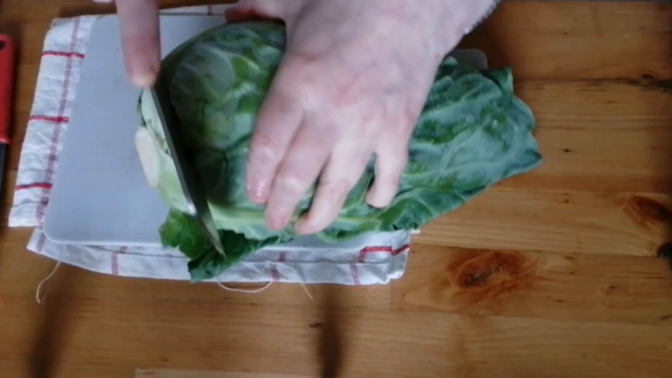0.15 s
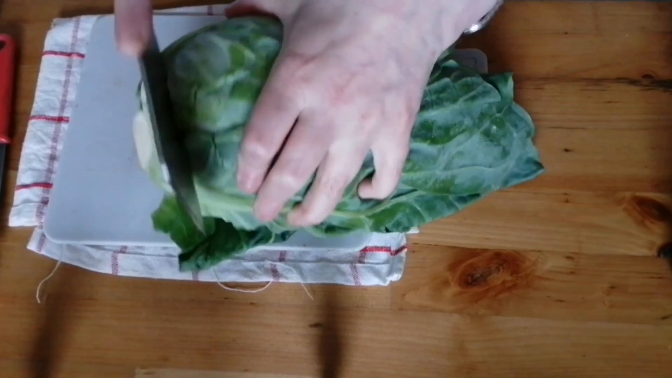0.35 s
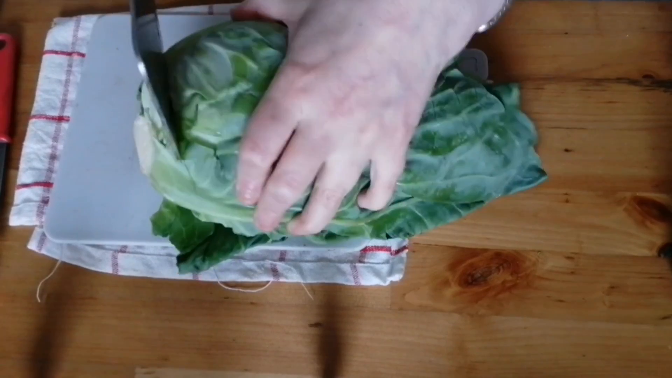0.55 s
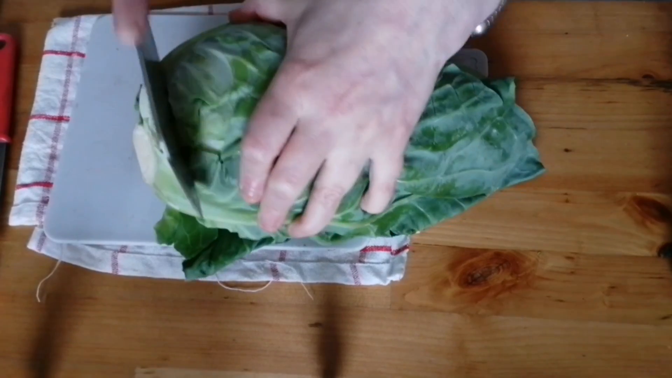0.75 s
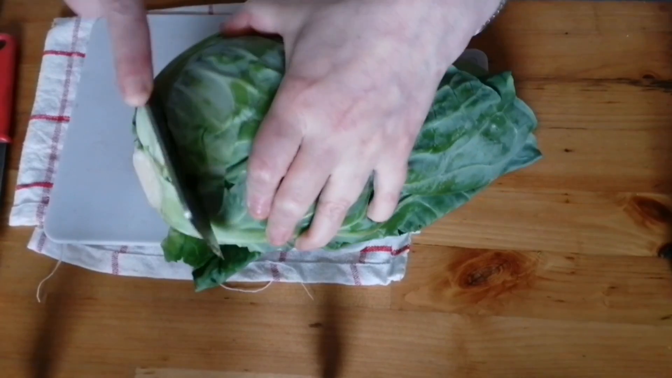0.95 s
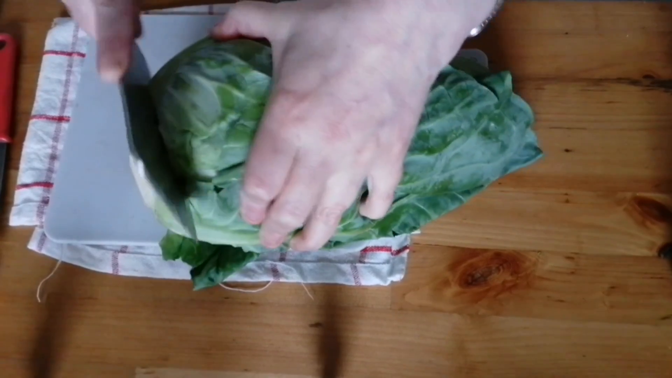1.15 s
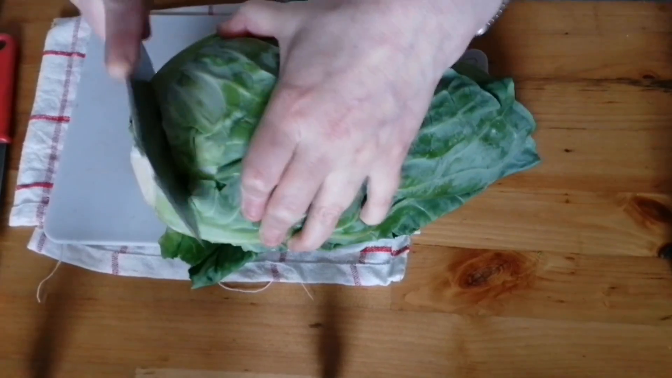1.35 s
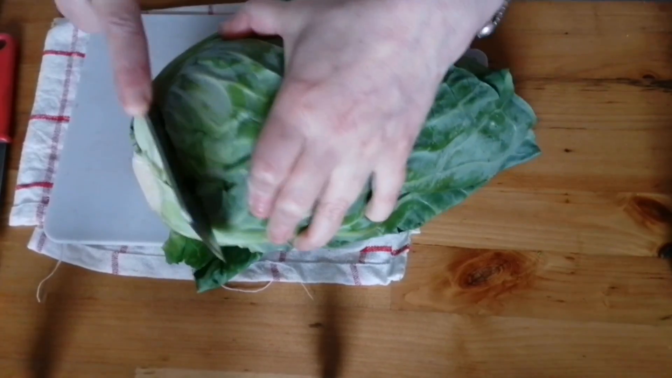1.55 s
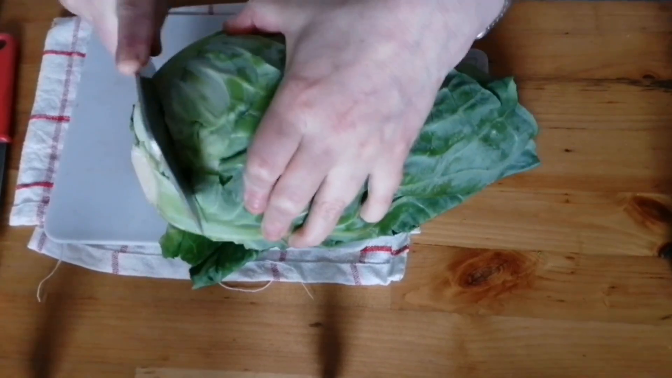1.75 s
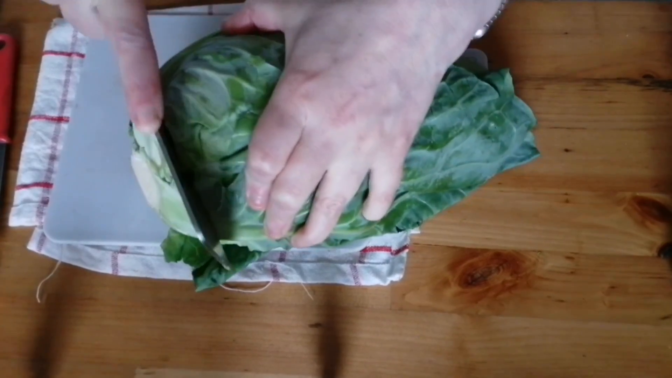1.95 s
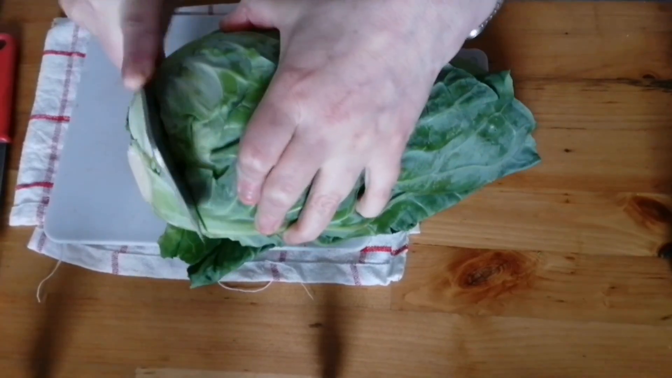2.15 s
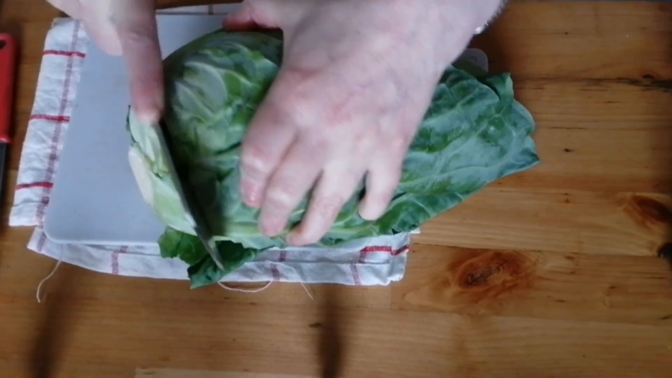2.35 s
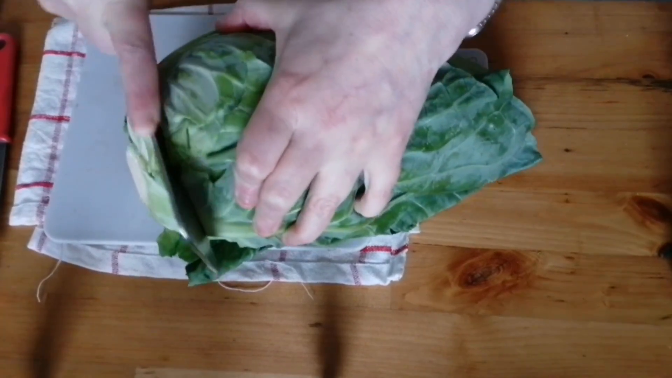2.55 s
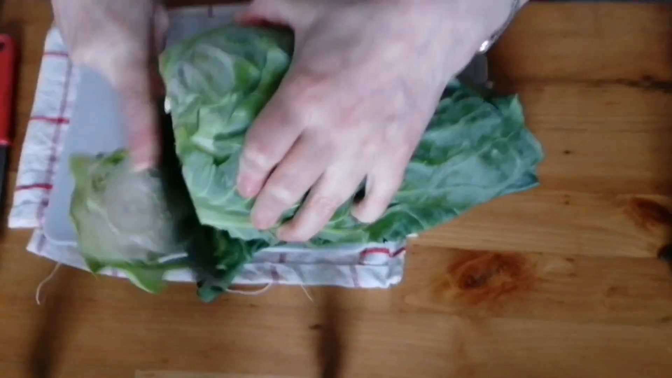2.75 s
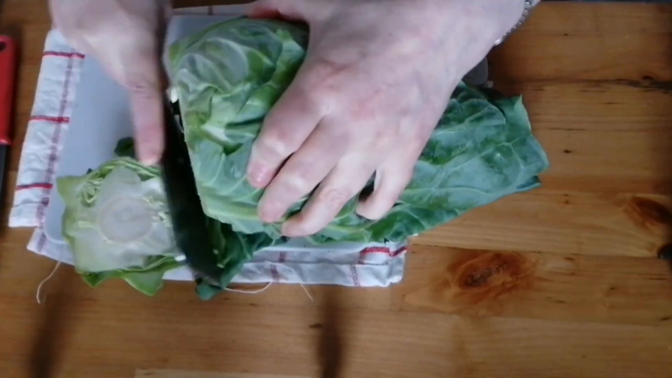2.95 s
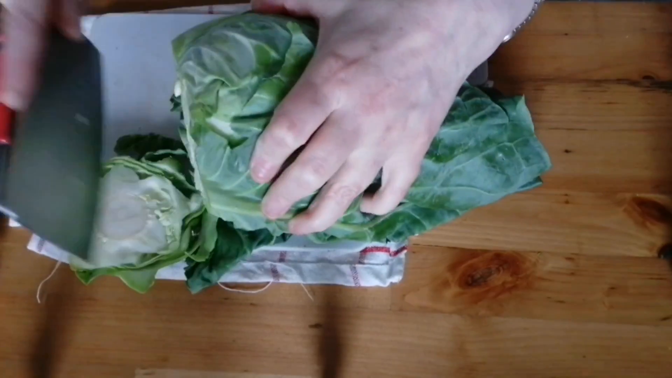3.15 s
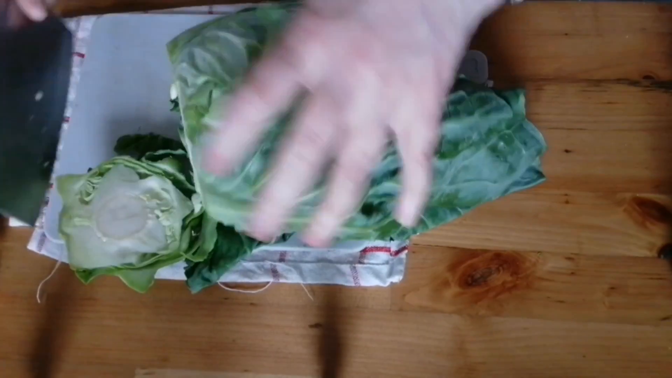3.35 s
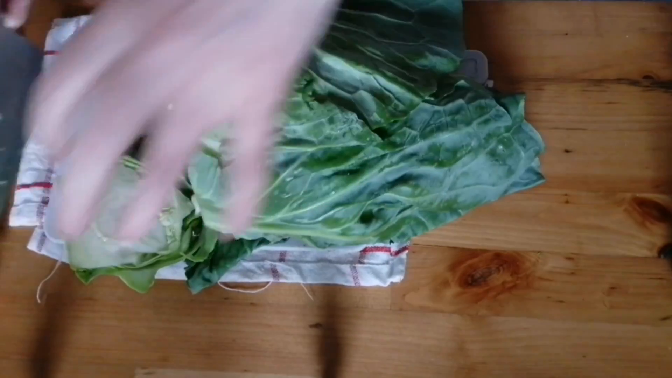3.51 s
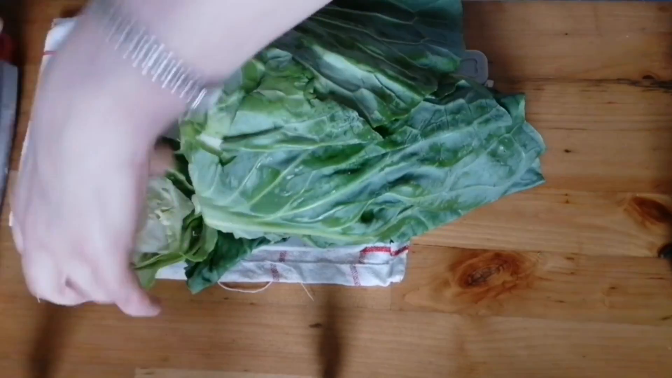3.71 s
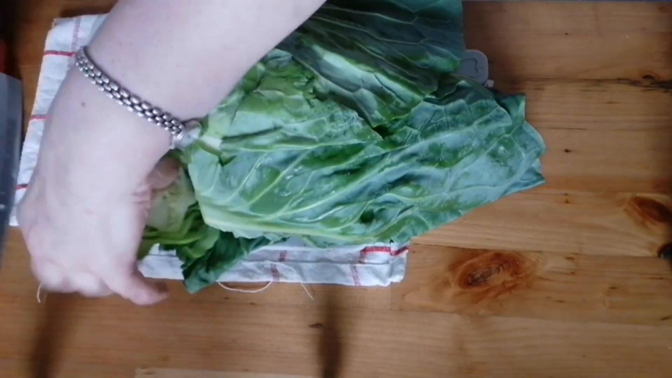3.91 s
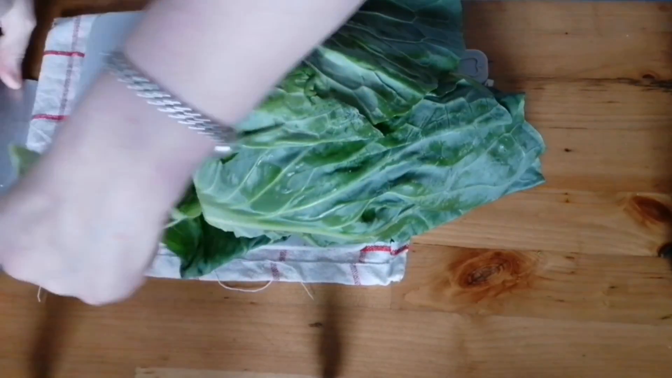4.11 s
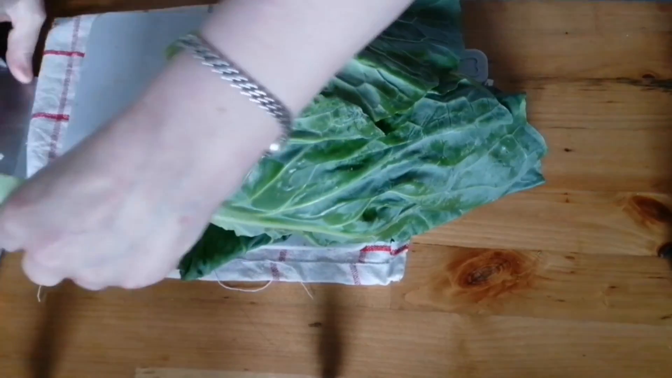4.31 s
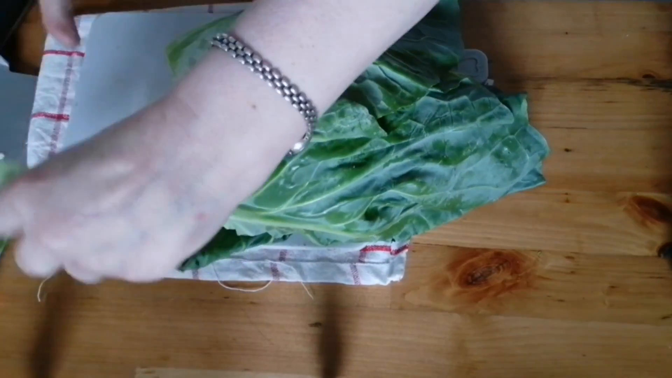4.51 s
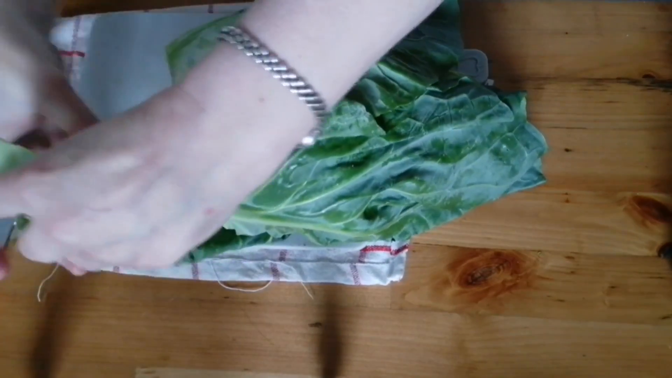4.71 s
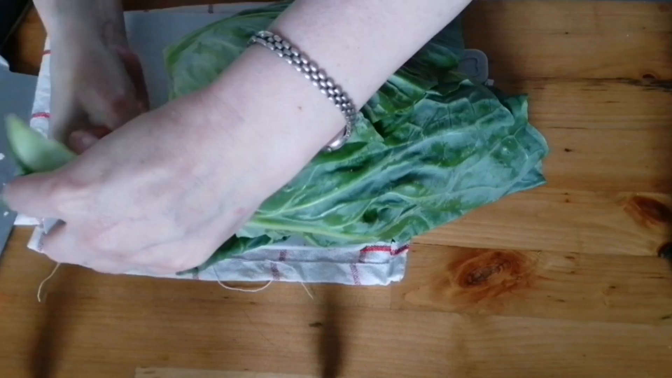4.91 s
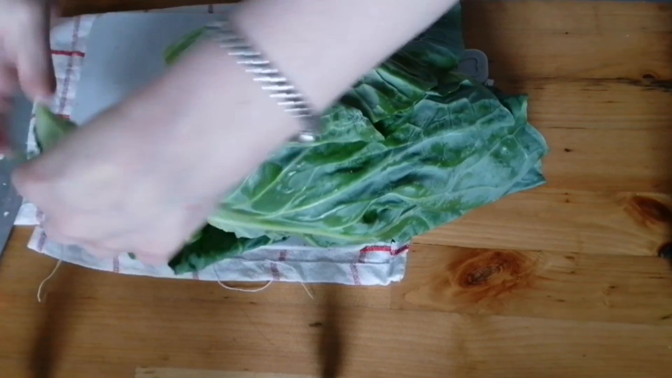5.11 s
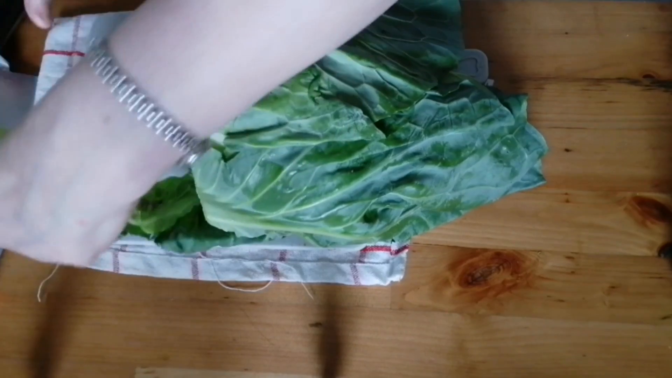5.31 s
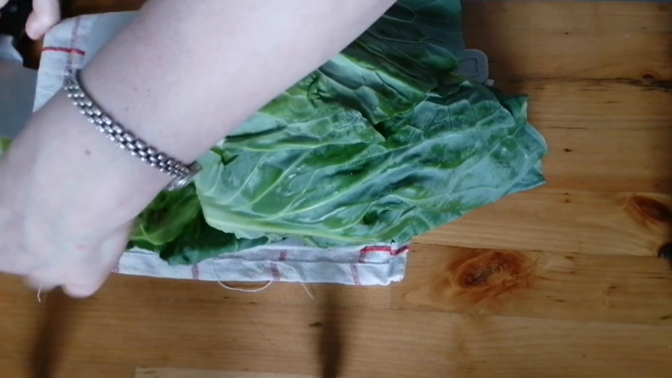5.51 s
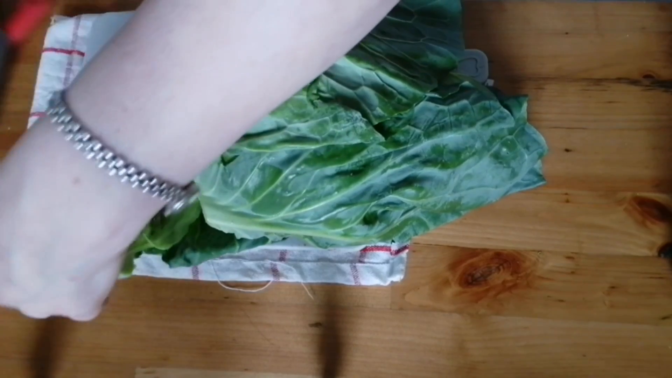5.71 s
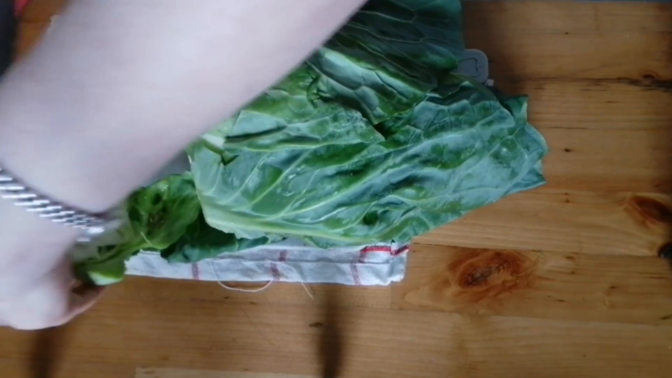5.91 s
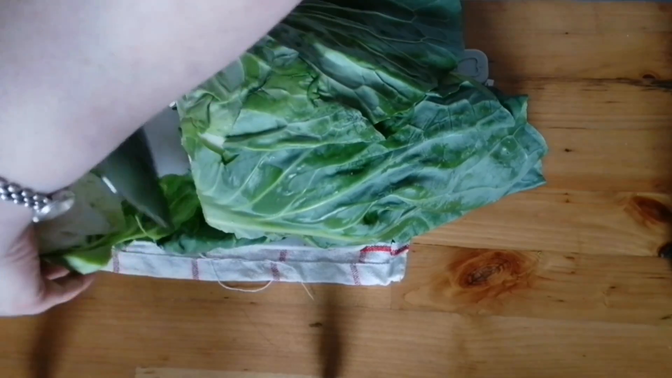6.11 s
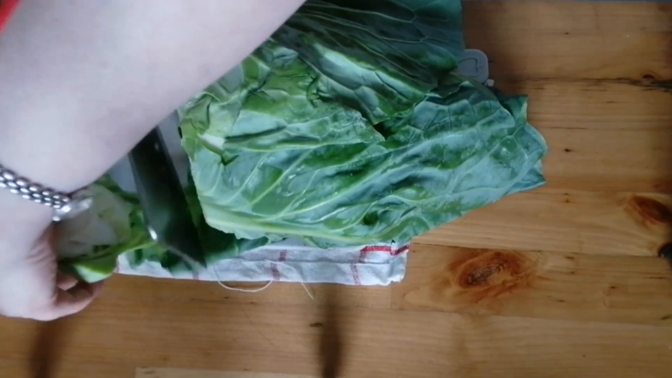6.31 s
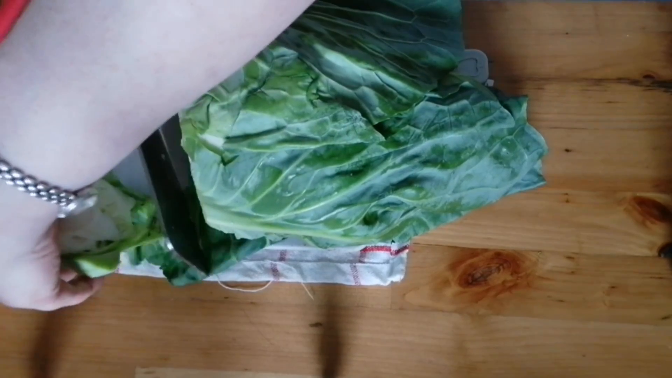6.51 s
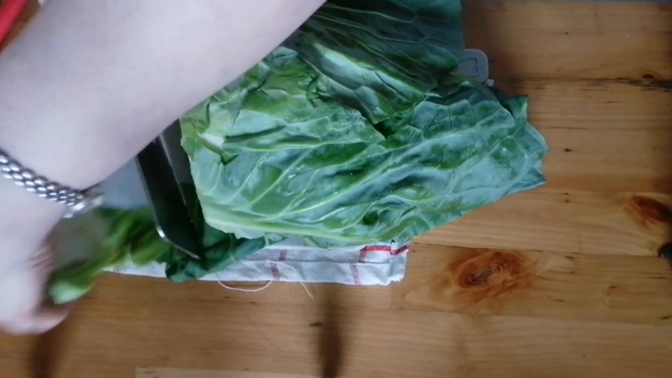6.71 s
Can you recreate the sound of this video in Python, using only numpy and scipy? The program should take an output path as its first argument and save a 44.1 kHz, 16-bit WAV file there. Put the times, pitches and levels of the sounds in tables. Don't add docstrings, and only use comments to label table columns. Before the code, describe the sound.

A close stereo perspective in a hard-walled home kitchen, with soft low air noise, barely audible hum and a distant engine drone swelling faintly around 1.2 s. From 0 to 2.4 s a knife saws a cabbage stalk in short strokes, several a second: wet granular crackle, slight creaking and bright rib snaps, with a light knock at 0.43 and the densest, strongest snapping around 1.8-2.4. A woody thump lands at 2.39, more crackle at 2.5, then the loudest crunch and double thud at 2.82-2.95. A small crunch follows at 3.13, then faint leaf ticks. At 3.93-3.96 the knife is laid on the table with a steel clack and deep thud; a firmer ringing knock comes at 4.30. Soft leaf ticks continue to 4.8, then near quiet. At 5.65-5.9 the blade is taken up with light taps and scrapes. At 6.7 a brief snap and moderate chop, then a faint rustle.

```python
import sys
import numpy as np
from scipy import signal
from scipy.fft import rfft, irfft, next_fast_len
from scipy.io import wavfile
from scipy.ndimage import uniform_filter1d

SR = 44100
rng = np.random.default_rng(int(sys.argv[2]) if len(sys.argv) > 2 else 0)


def log_audio(samples):
    frames = np.atleast_2d(samples).T
    limited = np.clip(frames, -1, 1)
    pcm = np.round(limited * 32767).astype(np.int16)
    wavfile.write(sys.argv[1], SR, pcm)


def volts_from_db(level):
    exponent = np.asarray(level, float) / 20
    return 10 ** exponent


N = 302526

# [frequency_hz, density_db]
AIR = [(25, -22), (60, -9.5), (120, -7.5), (197, -6), (240, -12.5), (360, -8.5), (620, -5), (1000, -11.5),
       (2000, -24.5), (3200, -28), (6300, -25), (8000, -30.5), (10000, -39), (15000, -42)]
# [frequency_hz, level_db]
HUM = [(199, -65.5)]
# [time_s, firing_rate_hz, level_db]
DRONE = [(0.0, 41.1, -52), (0.25, 41.4, -51.5), (0.45, 39.4, -64), (0.65, 37.94, -55.5), (0.94, 41.1, -42),
         (1.24, 41.84, -38), (1.39, 42.9, -39.5), (1.57, 44.2, -52.5), (2.18, 44.1, -58.5),
         (2.7, 34.4, -61), (2.88, 34.1, -56), (3.27, 34, -61), (3.63, 34.3, -49.5), (3.93, 37.3, -61),
         (4.53, 40.4, -69), (4.93, 43.2, -56), (5.67, 49.5, -63.5), (6.86, 39.4, -73)]
# [frequency_hz, likeness_0_to_1]
ALIKE = [(60, 0.68), (250, 0.77), (500, 0.67), (1000, 0), (2000, 0.06), (8000, 0)]
# [frequency_hz, t60_s]
KITCHEN_T60 = [(60, 0.31), (250, 0.48), (1000, 0.69), (4000, 0.64), (10000, 0.48), (16000, 0.16)]
# [frequency_hz, gain_db]
PORTS = [(20, -5), (40, 0.5), (3300, 3), (3900, -5), (4300, -6.5), (5000, -3.5), (15200, 1.5), (16200, -13),
         (16700, -48)]

# [frequency_hz, level_db, t60_s]
BLADE = [(2745, -13, .1), (3450, -23, .1), (4500, -21, .1), (5520, -13, .08), (6040, 0, .21),
         (6075, -13, .28), (10060, -20, .2), (11540, -23, .12), (13150, -22, .2), (14870, -18, .1)]
# [frequency_hz, level_db, t60_s]
TWIST = [(8010, -2, 0.16), (8040, -11, 0.4), (8850, -14, .1), (10075, -19, .35), (12500, -21, .15),
         (14870, -13, .14)]
# [start_s, ring_db, twist_minus_ring_db, left_minus_right_db]
CLINKS = [
    (3.9286, -46, -8, -1.5),
    (3.9345, -32.5, -18, 7),
    (4.2014, -54, -1.5, 8),
    (4.297, -48, -4, 6),
    (4.3036, -36.5, 3, 0),
    (4.3073, -45, -4, 14),
    (5.697, -62, 4, 0),
    (5.7434, -43.5, -14, 4),
    (6.51, -74, 2, 3),
]
# [start_s, peak_db, pitch_hz, left_minus_right_db]
CLACKS = [(3.9283, -21.5, 6500, 3), (3.9351, -24, 7200, 7.5), (4.2016, -30.5, 6200, 10.5),
          (4.298, -36, 6300, 17), (4.3035, -18, 5900, -2), (4.3066, -22.5, 7600, 15),
          (5.698, -38.5, 7550, 6), (5.712, -46, 6600, 0), (5.7433, -31.5, 5900, 4), (5.753, -42, 6100, 2),
          (5.86, -52, 4500, 0), (5.922, -52, 4500, -2)]
# [start_s, rise_s, hold_s, ring_db, twist_minus_ring_db]
SLIDES = [
    (4.33, .01, .05, -62, 4),
    (5.66, .03, .05, -74, 9),
    (5.755, .008, .03, -58, -12),
    (5.82, .01, .02, -70, 2),
    (5.85, .006, .025, -65, 8),
    (5.895, .006, .045, -61, -2),
]

# [frequency_hz, level_db, t60_s]
TABLE = [(167, -30, 0.06), (254, -4, 0.4), (336.7, -5.5, 0.38), (451, -5, 0.4), (529, -14.5, 0.49),
         (560, -7, 0.72), (634.6, -12, 0.29), (684, -42, 0.55), (806, -19, 0.24), (982, -12, 0.48),
         (1194, -19, 0.39), (1420, -29, 0.22)]
# [frequency_hz, level_db, t60_s]
BOOM = [(64.4, -12, 0.052), (91, 6, 0.096), (122, 5, 0.071)]
# [start_s, peak_db, low_pitch_hz, high_pitch_hz, high_minus_low_db]
BLOWS = [(0.4299, -25, 373, 706, 11), (0.51, -35, 300, 554, 23), (.676, -37.5, 360, 550, 24),
         (0.77, -35.5, 308, 550, 9), (1.458, -35, 216, 594, 13), (1.781, -41, 173, 612, 3),
         (2.127, -36, 203, 1020, 17), (2.388, -15, 305, 615, -1), (2.912, -12.5, 417, 152, 6.5),
         (3.138, -33, 429, 589, 8), (3.9291, -25.5, 446, 930, 11), (3.9544, -11.5, 387, 676, -4),
         (4.1785, -25.5, 392, 532, -13), (4.277, -27, 271, 550, -15.5), (4.304, -21, 260, 470, 14.5),
         (4.47, -39, 254, 545, -9), (5.658, -43.5, 234, 427, -24), (5.789, -33, 386, 680, -6),
         (5.827, -26, 242, 780, 13), (5.845, -33, 304, 418, -15), (5.867, -32, 370, 534, -15),
         (5.894, -34, 410, 490, 1)]
# [start_s, peak_db, low_pitch_hz, high_pitch_hz,
# high_minus_low_db]
THUMPS = [(.333, -36.5, 131, 560, 6), (1.849, -43, 182, 895, 18.5), (2.234, -32, 400, 1360, 53),
          (2.289, -31, 430, 865, 25), (2.854, -31.5, 374, 810, 13), (2.9026, -12, 273, 890, 5.5),
          (6.7214, -21, 462, 990, 13.5), (3.96, -30, 180, 330, -7), (4.312, -35, 200, 350, -6),
          (5.83, -40, 200, 350, -9), (5.9, -41, 200, 350, -6)]

# [start_s, peak_db, dull_minus_bright_db, pitch_hz]
SNAPS = [(0.146, -39, -9, 6770), (0.2523, -50, -2, 6810), (0.3027, -42, -9, 6390), (0.3301, -40, -12, 7260),
         (0.3477, -36, -4, 5610), (0.5075, -31, -4, 5560), (0.619, -31.5, -19, 6870),
         (0.6392, -29, -20, 7030), (0.6634, -35, -17, 6540), (0.748, -43, -6, 6060), (0.75, -23, -24, 6540),
         (0.77, -31, -14, 6540), (0.832, -31, -20, 5210), (0.8539, -34, -18, 5680), (0.929, -34, -4, 6110),
         (0.9807, -31.5, -12, 7100), (0.9991, -29.5, -9.5, 6840), (1.0164, -38, -17, 6740),
         (1.042, -37, -11, 7170), (1.056, -33, -17, 8270), (1.0807, -34, -10, 6730),
         (1.091, -32, -14, 6370), (1.1094, -31, -12, 5340), (1.1377, -30.5, -7.5, 6760),
         (1.1765, -31, -16, 5380), (1.1854, -35, -13, 6700), (1.3506, -34, -9, 7010),
         (1.3745, -35.5, -10, 5190), (1.457, -30, -12, 5450), (1.548, -24, -7, 6850),
         (1.6427, -39, -21, 5940), (1.712, -37.5, -11, 5240), (1.7174, -34, -14, 6680),
         (1.7779, -36, -14, 8290), (1.8103, -28.5, -33, 5460), (1.8461, -24.5, -22, 7030),
         (1.86, -23.5, -20, 5470), (1.9775, -25.5, -16, 6980), (2.008, -25.5, -19, 6560),
         (2.0874, -28, -12, 8000), (2.2098, -35.5, 2.5, 5150), (2.222, -36.5, -1, 5130),
         (2.2334, -21.5, -15.5, 8600), (2.2548, -31, -8, 5260), (2.2614, -28.5, -11, 5170),
         (2.2874, -24.5, -5.5, 7010), (2.302, -34, -14, 7090), (2.317, -35, -9, 7120),
         (2.3723, -27.5, -15, 5900), (2.378, -25, -9, 7100)]
# [start_s, peak_db, dull_minus_bright_db,
# pitch_hz, left_minus_right_db]
TEARS = [(2.499, -25.5, -18, 5800, 6.5), (2.5234, -24.5, -11, 6940, 2), (2.5803, -31.5, -19, 6510, 3),
         (2.7434, -48, -10, 6040, 2.0), (2.7732, -32, -13, 5070, 9), (2.825, -19.5, -9, 4810, 4),
         (2.8559, -15.5, -12, 5160, 7), (2.887, -32, -4, 7370, -1.0), (2.8934, -30, -10, 6860, -2),
         (2.9006, -31, -4, 6420, 4), (2.913, -21, -15, 6000, 2.0), (2.9214, -28, -17, 5500, 0),
         (2.9414, -38, -8, 5800, 1.0), (3.1363, -31.5, -6, 5600, 3), (3.2844, -41, -15, 6200, 0.0),
         (3.3458, -42, -19, 4900, 3.0), (3.3907, -44, -16, 6850, -3), (3.481, -40.5, -19, 6870, 5),
         (3.5628, -47, -15, 6590, 1.5), (3.5823, -51, -15, 6080, 2.0), (3.6697, -42.5, -3, 6540, 7.5),
         (4.4729, -40, -3, 7980, -2.5), (4.6264, -47, -12, 5170, -5), (4.6514, -53, -3, 7910, -3.0),
         (4.6748, -39.5, -5, 6970, 0), (4.6854, -37, -9, 6870, 0), (4.7222, -52, -4, 6450, -2),
         (4.7544, -51, 0.5, 6990, -0.5), (5.015, -51.5, -5, 6470, 0.0), (5.0294, -65, -2, 5330, -2),
         (5.4755, -54, -5, 6630, 0.5), (5.7877, -51, -8, 6030, 0), (5.896, -48, 5, 6050, -3),
         (6.6644, -66, 8, 7110, 0.5), (6.6972, -34, -12, 8900, -5.0), (6.7024, -38, -15, 4770, -3.5),
         (6.7074, -38, -2.5, 8830, -2.0), (6.7223, -33.5, -1.5, 6450, 5), (6.8504, -42, -12, 8230, -1.0)]
# [frequency_hz, density_db]
CRACKLE = [(600, -29), (1000, -8.5), (1700, -4.5), (2200, -7), (2850, -4), (4000, -5), (5000, 1.5),
           (6900, 1), (8300, -2), (10900, -13), (15000, -19.5)]
# [frequency_hz, density_db]
CREAK = [(120, -42), (250, 6), (550, 2), (1000, 7), (1600, -5), (2500, -29.5)]
# [start_s, rise_s, hold_s, crackle_db, creak_minus_crackle_db]
STROKES = [(-.02, 0.015, 0.062, -40, -3), (0.238, 0.0083, 0.047, -53.5, -3.5),
           (0.3, 0.032, 0.016, -38, -7.5), (0.407, 0.023, 0.04, -47, 3), (0.501, 0.007, 0.091, -44.5, -5),
           (0.62, 0.028, 0.026, -43, -12), (0.727, 0.027, .04, -43.5, -2), (0.809, 0.027, 0.016, -42, -43),
           (0.923, 0.0089, 0.22, -44, -15), (1.253, 0.056, 0.086, -47.5, -3),
           (1.45, 0.0076, 0.017, -39, -5.5), (1.53, .005, 0.098, -48.5, -8.5),
           (1.685, 0.02, 0.013, -50, -1), (1.758, 0.078, 0.015, -40.5, -15),
           (1.973, 0.0035, 0.092, -43.5, -23), (2.079, 0.007, 0.05, -43, 0),
           (2.219, 0.056, 0.089, -40.5, -8), (2.49, 0.0069, 0.1, -45, -12), (2.759, 0.0082, 0.01, -48, -18),
           (2.821, 0.0043, 0.0064, -35.5, -10), (2.85, 0.0057, 0.059, -30.5, -1.5),
           (2.95, .01, 0.15, -54.5, 1), (3.132, 0.0068, 0.014, -46, 0.5), (3.211, 0.021, 0.28, -56.5, -28)]
# [start_s, rise_s, hold_s, crackle_db, creak_minus_crackle_db]
HANDLING = [
    (3.55, 0.019, 0.06, -63.5, -6),
    (4.54, 0.023, 0.088, -62.5, 1),
    (4.671, 0.0079, 0.028, -55.5, -6),
    (4.98, 0.021, 0.024, -66.5, 9),
    (5.62, 0.044, 0.034, -59, 5.5),
    (5.741, 0.0069, 0.11, -59, 7.5),
    (5.80, 0.035, 0.092, -60.5, 20.5),
    (6.479, 0.026, 0.011, -63.5, -7),
    (6.692, 0.0055, 0.029, -66, -11),
    (6.83, .03, .02, -63, -8),
]

AIR_DB, DRONE_SECOND_DB = -57, -13.5
RISE_DB, SAG_DB_PER_S, RELEASE_DB_PER_S = 16.5, 14, 239
THIN_RIB_LEFT = 0.2
LIGHT_BOOM_DB, THUMP_BOOM_DB = -32, 1
LIGHT_CONTACT_S, THUMP_CONTACT_S = .00055, .0003
CLACK_DULL_DB = -16
HARD_CLACK_DB = -31
SOFT_TILT, HARD_KNOCK_DB = .36, -35
SLIDE_TILT = -6


def on_log(table, hz):
    f, v = np.transpose(table)
    return np.interp(np.log(np.maximum(hz, 1)), np.log(f), v)


def colour(x, spectrum, size=1024):
    gain_db = on_log(spectrum, np.arange(size // 2 + 1) * SR / size)
    cepstrum = irfft(gain_db * np.log(10) / 20)
    cepstrum[1:size // 2] *= 2
    cepstrum[size // 2 + 1:] = 0
    response = irfft(np.exp(rfft(cepstrum)))
    return signal.fftconvolve(x, response / np.sqrt(np.sum(response ** 2)))[:N]


def diffuse(length):
    mid, side = rfft(rng.standard_normal((2, length)))
    likeness = np.clip(on_log(ALIKE, np.arange(len(mid)) * SR / length), 0, 1)
    mid = mid * np.sqrt((1 + likeness) / 2)
    side = side * np.sqrt((1 - likeness) / 2)
    return irfft(np.array([mid + side, mid - side]), length)


def add(out, s, sound, db, pan_db):
    i = int(s * SR)
    sound = sound[..., :N - i]
    out[:, i:i + sound.shape[-1]] += sound * volts_from_db(db + np.array([[pan_db], [-pan_db]]) / 2)


def ring(modes, spread, lag_s, length_s):
    t = np.arange(int(length_s * SR)) / SR
    hz, db, t60 = np.transpose(modes)[:, :, None]
    lag = lag_s[:len(modes), None] * np.array([1, -1])[:, None, None] / 2
    fade = volts_from_db(db + spread[:len(modes), None]) * np.exp(-np.log(1000) * t / t60)
    return np.sum(fade * np.sin(2 * np.pi * hz * (t + lag)), axis=1)


def push(x, seconds):
    y = signal.fftconvolve(x, np.hanning(int(seconds * SR) + 3)[None], axes=1)[:, :x.shape[1]]
    return y / np.abs(y).max()


def grains(per_s, scatter_db):
    sparse = (rng.random(N) < per_s / SR) * rng.standard_normal(N)
    x = sparse * volts_from_db(scatter_db * np.minimum(rng.exponential(size=N), 4))
    return x / np.sqrt(np.mean(x ** 2))


def flicker(per_s, depth_db):
    kicks = (rng.random(N) < per_s / SR) * rng.exponential(size=N)
    y = signal.lfilter([1], [1, -np.exp(-per_s / SR)], kicks)
    return volts_from_db(depth_db * (y - y.mean()) / y.std())


def effort(t, start, rise, hold, db):
    since = t - start - rise
    fall = SAG_DB_PER_S * np.clip(since, 0, hold) + RELEASE_DB_PER_S * np.maximum(since - hold, 0)
    return np.where(t < start, -140, db + RISE_DB * np.minimum(since / max(rise, .002), 0) - fall)


def splinters(events, top_db, fast_s, slow_s, slow_share, dull_lift_db, sharp):
    bands = np.zeros((2, 2, N))
    t = np.arange(int(0.08 * SR)) / SR
    for s, db, dull_db, pitch_hz, pan_db in events:
        decay = np.exp(-t / fast_s) + slow_share * np.exp(-t / slow_s)
        burst = rng.standard_normal((4, len(t))) * decay * np.minimum(t / 0.00083, 1)
        pitches = (pitch_hz, 2700 * 1.06 ** rng.uniform(-1.93, 1))
        gains_db = (-6.0, dull_db + dull_lift_db - 8.5)
        for band, hz, pair, gain_db in zip(bands, pitches, burst.reshape(2, 2, -1), gains_db):
            pair = 0.5 * pair + 1.72 * signal.lfilter(*signal.iirpeak(hz, sharp, fs=SR), pair)
            ports = pair[0] + 0.93 * pair[1] * np.array([[1], [-1]])
            add(band, s, ports, db + gain_db, pan_db)
    dull = [(500, -52.5), (1200, 6.5), (2800, 3), (3600, 6.5), (4500, -50.0)]
    bright = [(3000, -21.5), (4500, -3.5), (6900, -6.5), (9000, top_db / 2), (11000, top_db), (15000, top_db - 0.5)]
    return np.array([colour(b, bright) + colour(d, dull) for b, d in zip(*bands)])


def background():
    t = np.arange(N) / SR
    air = np.array([colour(x, AIR, size=8192) for x in diffuse(N)]) * flicker(6, depth_db=.4)
    time_s = np.transpose(DRONE)[0]
    _, rate_hz, level_db = (np.interp(t, time_s, column) for column in np.transpose(DRONE))
    wobble = uniform_filter1d(uniform_filter1d(rng.standard_normal(N), 2000), 2000)
    wobble = wobble / wobble.std()
    phase = 2 * np.pi * np.cumsum(rate_hz * (1 + 0.03 * wobble)) / SR
    overtones = np.sin(2 * phase) + 0.53 * np.sin(3 * phase)
    drone = volts_from_db(level_db - 4.0) * (np.sin(phase) + volts_from_db(DRONE_SECOND_DB) * overtones)
    hum = sum(volts_from_db(db) * np.sin(2 * np.pi * hz * t + 1.67 * wobble) for hz, db in HUM)
    return volts_from_db(AIR_DB) * air + drone + hum


def kitchen(dry):
    t = np.arange(int(1.1 * SR)) / SR
    noise = rfft(diffuse(len(t)))
    octave = np.log2(np.arange(1, noise.shape[1] + 1) * SR / len(t))
    centres = np.array(KITCHEN_T60)[:, 0]
    tail = 0
    for hz, t60 in KITCHEN_T60:
        share = np.interp(octave, np.log2(centres), centres == hz)
        tail = tail + irfft(noise * share, len(t)) * np.exp(-np.log(1000) * t / t60)
    tail = tail * np.clip((t - .002) / 0.0017, 0, 1)
    tail = tail / np.sqrt(np.sum(tail ** 2) / 2)
    return signal.fftconvolve(dry.mean(axis=0)[None], tail, axes=1)[:, :N]


def clinks():
    out = np.zeros((2, N))
    for s, db, twist_db, pan_db in CLINKS:
        chance = rng.standard_normal((2, 16))
        tilt = SOFT_TILT * (db - HARD_KNOCK_DB)
        struck = [(f, d + tilt * np.log2(f / BLADE[4][0]), t60) for f, d, t60 in BLADE]
        add(out, s, ring(struck, 0.44 * chance[0], .000015 * chance[1], length_s=.5), db, pan_db)
        twisted = ring(TWIST, 1.7 * chance[1], .000015 * chance[0], length_s=.5)
        add(out, s, twisted, db + twist_db, pan_db - 13.0)
    return out


def slides():
    out = np.zeros((2, N))
    t = np.arange(N) / SR
    grit = grains(900, scatter_db=5.5)
    chance = rng.standard_normal(16)
    for modes, share, tilt_hz, pan_db in ((BLADE, 0, BLADE[4][0], 1.5), (TWIST, 1, TWIST[0][0], -6.0)):
        drag = grit * sum(volts_from_db(effort(t, *row[:3], row[3] + share * row[4])) for row in SLIDES)
        damped = [(f, d + SLIDE_TILT * np.log2(f / tilt_hz), 0.35 * t60) for f, d, t60 in modes]
        pressed = ring(damped, 0 * chance, .00001 * chance, length_s=.3)
        add(out, 0, signal.fftconvolve(drag[None], pressed, axes=1), -22.0, pan_db)
    return out


def blade():
    ringing = clinks() + slides()
    clacks = [(s, db, CLACK_DULL_DB, hz, pan_db) for s, db, hz, pan_db in CLACKS]
    rocking = flicker(90, depth_db=1.5)
    hard = [c for c in clacks if c[1] > HARD_CLACK_DB]
    soft = [c for c in clacks if c[1] <= HARD_CLACK_DB]
    hard = splinters(hard, top_db=-10.0, fast_s=0.0037, slow_s=0.035, slow_share=0.063, dull_lift_db=3.5, sharp=2.56)
    soft = splinters(soft, top_db=-21.0, fast_s=0.0039, slow_s=0.03, slow_share=0.18, dull_lift_db=-3.5, sharp=4.2)
    return ringing * rocking + hard + soft


def blows():
    out = np.zeros((2, N))
    t = np.arange(int(.4 * SR)) / SR
    light = [b + (LIGHT_BOOM_DB, LIGHT_CONTACT_S) for b in BLOWS]
    heavy = [c + (THUMP_BOOM_DB, THUMP_CONTACT_S) for c in THUMPS]
    for s, db, low_hz, high_hz, high_db, boom_db, touch_s in light + heavy:
        chance = rng.standard_normal((3, len(t)))
        near = [(f, d - 2.0 * abs(np.log2(f / low_hz)) - 2.5, 0.32 * t60) for f, d, t60 in TABLE]
        near += [(low_hz, 0, .045), (high_hz, high_db + .5, .018)]
        modes = ring(near, 1.8 * chance[0], .00025 * chance[1], length_s=.4)
        edges_hz = [0.58 * low_hz, 1.39 * max(high_hz, low_hz)]
        band = signal.butter(2, edges_hz, "bandpass", fs=SR, output="sos")
        rattle = signal.sosfilt(band, (chance[0] + 0.18 * chance[1:]) * np.exp(-t / 0.018))
        contact_s = touch_s * volts_from_db(-0.7 * min(high_db, 0))
        body = .25 * push(rattle, .0003) - push(modes, contact_s)
        body += .33 * push(chance[:2] * np.exp(-t / .002), 1.2 * contact_s)
        radiation = signal.butter(2, 0.31 * low_hz, "highpass", fs=SR, output="sos")
        add(out, s, signal.sosfilt(radiation, body), db - 0.5, -.5)
        legs = push(ring(BOOM, 1.8 * chance[2], .0001 * chance[1], length_s=.4), 0.0046)
        add(out, s + 0.0015, legs, db + boom_db - 7.5, 0)
    return signal.sosfilt(signal.butter(2, 36, "highpass", fs=SR, output="sos"), out)


def snaps():
    sawn = [(s, db, dull_db, hz, -THIN_RIB_LEFT * dull_db) for s, db, dull_db, hz in SNAPS]
    return splinters(sawn + TEARS, top_db=-17.0, fast_s=0.0013, slow_s=0.011, slow_share=0.18,
                     dull_lift_db=4.0, sharp=3.8)


def patchy(x):
    centres = np.log([700, 1500, 2700, 4500, 6200, 8300, 11500])
    size = next_fast_len(N)
    log_hz = np.log(np.arange(1, size // 2 + 2) * SR / size)
    whole = rfft(x, size)
    return sum(flicker(45, depth_db=2.2) * irfft(whole * np.interp(log_hz, centres, centres == c), size)[:, :N]
               for c in centres)


def leaves():
    t = np.arange(N) / SR
    bright, dull = np.zeros(N), np.zeros(N)
    for start, rise, hold, db, creak_db in STROKES + HANDLING:
        push_gain = volts_from_db(effort(t, start, rise, hold, db))
        bright += push_gain
        dull += push_gain * volts_from_db(creak_db)
    slips = flicker(70, depth_db=1.4)
    cells = [grains(5000, scatter_db=2.6) for _ in range(2)]
    shared, wide = (colour(c, CRACKLE) * bright * volts_from_db(-4.5) for c in cells)
    crackle = shared * volts_from_db(np.array([[1.1], [-1.1]])) + wide * np.array([[1], [-1]])
    creak = colour(grains(2500, scatter_db=3.5), CREAK) * dull * volts_from_db(-9.0)
    return slips * (patchy(crackle) + creak)


def scene():
    crisp, knocks, steel = leaves() + snaps(), blows(), blade()
    wet = kitchen(crisp * volts_from_db(-7.0) + knocks * volts_from_db(-3.5) + steel * volts_from_db(-2.5))
    return crisp + knocks + steel + wet + background()


def top_cut(x):
    return signal.sosfilt(signal.butter(12, 16640, fs=SR, output="sos"), x)


def record(dry):
    heard = np.array([colour(x, PORTS, size=4096) for x in dry]) * volts_from_db(-2.5)
    return top_cut(heard)


dry = scene()
out = record(dry)
log_audio(out)
```